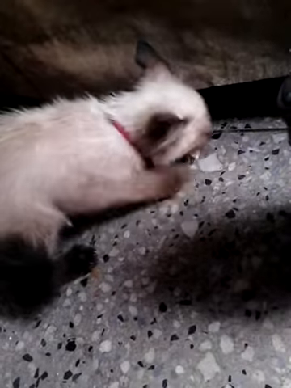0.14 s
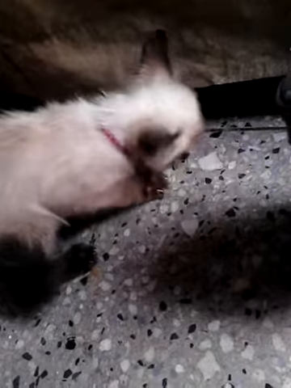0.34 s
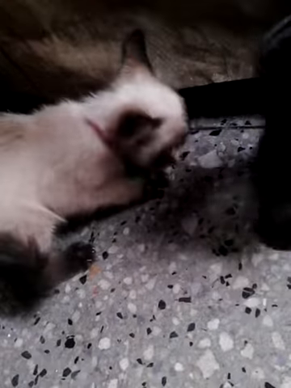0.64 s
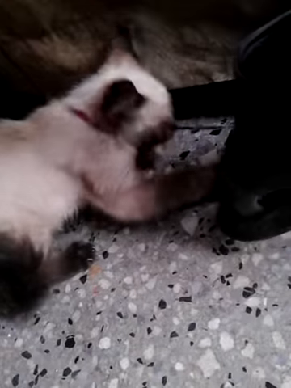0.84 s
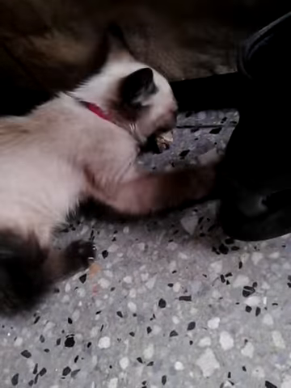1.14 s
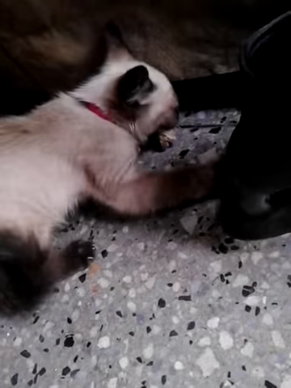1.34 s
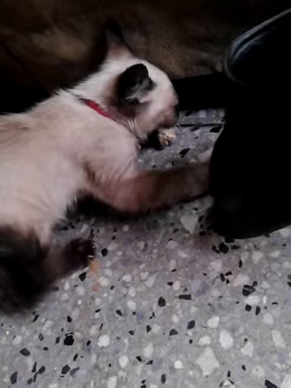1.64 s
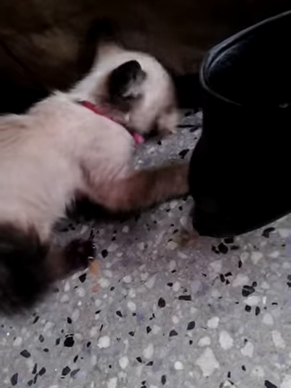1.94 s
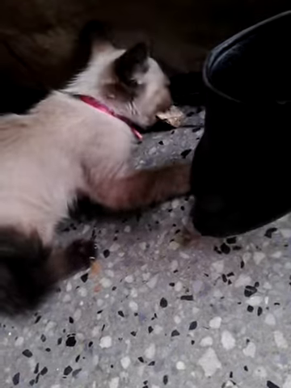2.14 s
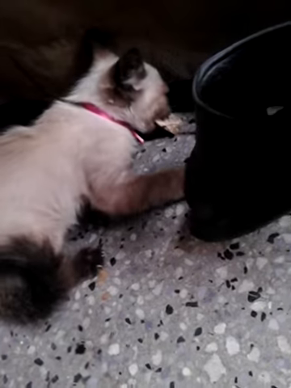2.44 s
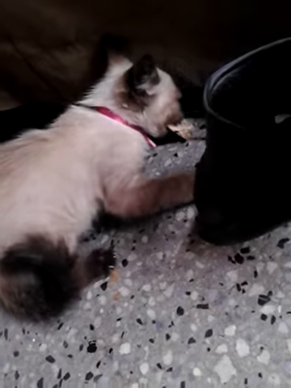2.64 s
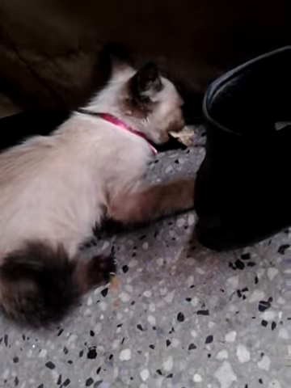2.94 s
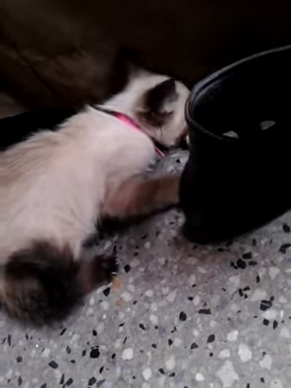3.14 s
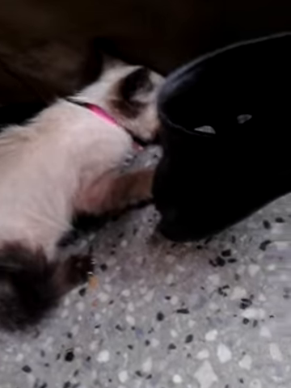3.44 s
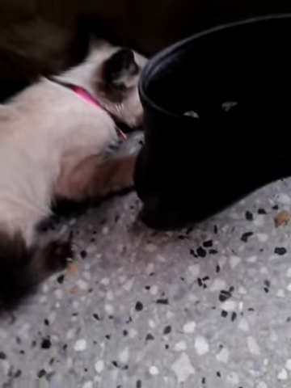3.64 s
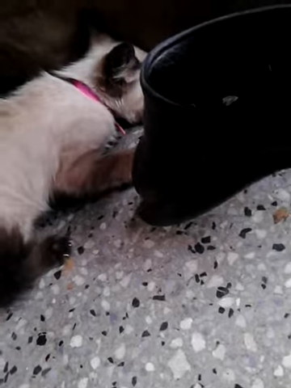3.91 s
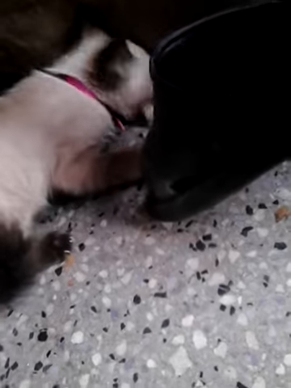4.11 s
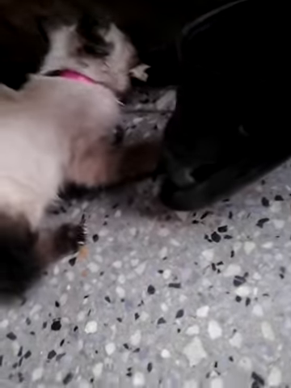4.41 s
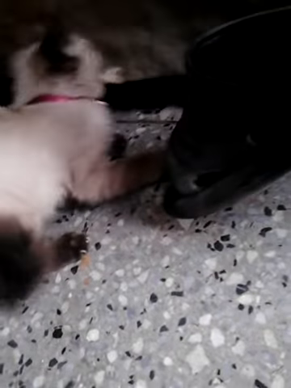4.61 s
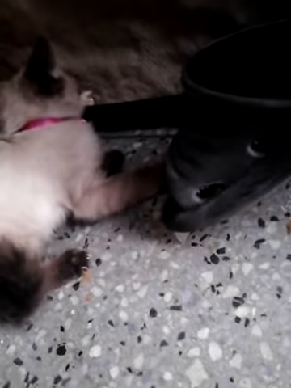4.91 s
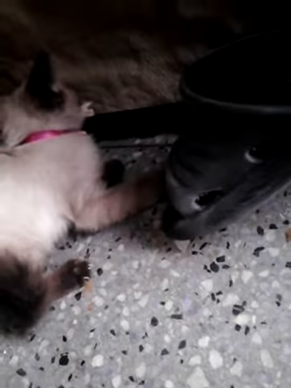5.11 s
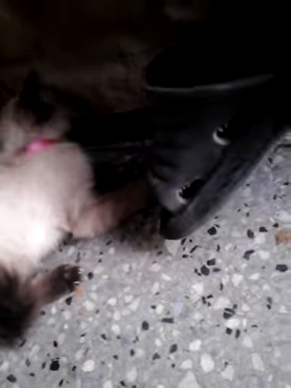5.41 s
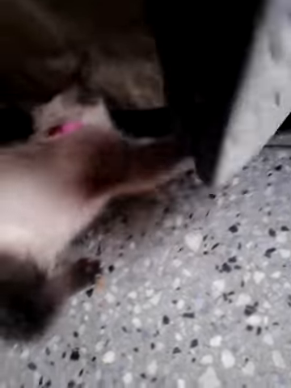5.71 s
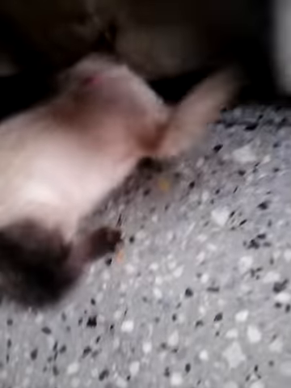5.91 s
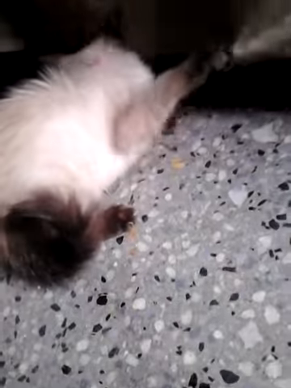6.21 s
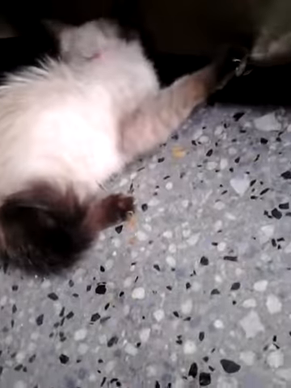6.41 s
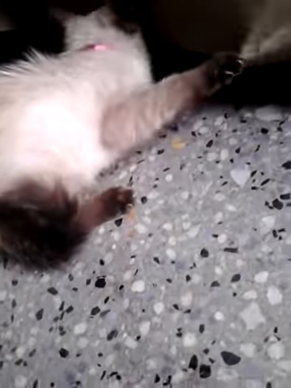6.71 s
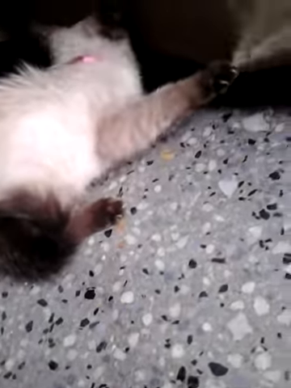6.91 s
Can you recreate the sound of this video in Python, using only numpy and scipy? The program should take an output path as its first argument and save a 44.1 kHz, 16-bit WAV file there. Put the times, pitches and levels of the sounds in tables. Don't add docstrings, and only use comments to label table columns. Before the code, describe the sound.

Close to a small microphone in a quiet hard-floored room, a kitten growls over its food. A short uneven growl is already under way, then two long wavering ones, the second loudest, then a weak short one and a last low one cut off at the end. Between them come faint rubbing, low hollow boot hums and thuds, and tiny claw ticks.

```python
import sys
import numpy as np
from scipy import signal
from scipy.io import wavfile
from scipy.ndimage import uniform_filter1d

SR = 44100
rng = np.random.default_rng(int(sys.argv[2]) if len(sys.argv) > 2 else 0)


def elevation(decibels):
    levels = np.asarray(decibels, float)
    return 10 ** (levels / 20)


def file_out(sig):
    cols = np.atleast_2d(sig).T
    lim = np.clip(cols, -1, 1)
    pcm = np.round(lim * 32767).astype(np.int16)
    wavfile.write(sys.argv[1], SR, pcm)


N = 311204
REGISTER_GLIDE_S = .04

# time_s, pitch_hz
PITCH = [
    [(0, 388), (.17, 404), (.25, 390), (.31, 404), (.36, 383), (.53, 385), (.68, 348)],
    [(.98, 355), (1.19, 428), (1.3, 416), (1.59, 402), (1.68, 394), (1.93, 395), (2.065, 455), (2.17, 432),
     (2.45, 296)],
    [(2.96, 287), (3.09, 318), (3.32, 360), (3.47, 400), (3.73, 394.5), (4.126, 399), (4.2, 387),
     (4.43, 396), (4.64, 316)],
    [(5.66, 337), (5.77, 348), (5.83, 370), (5.93, 392), (6.09, 380), (6.24, 325)],
    [(6.8, 317), (6.9, 331), (7.04, 329)],
]
# time_s, level_db
EFFORT = [
    [(0.0, -48), (0.01, -35.5), (0.042, -28.5), (0.054, -41.5), (0.165, -47.5), (0.36, -27), (0.402, -25.5),
     (0.53, -32), (0.68, -58)],
    [(0.98, -64), (1.028, -25.5), (1.24, -21), (1.664, -20), (1.804, -20), (2.116, -25), (2.234, -20),
     (2.52, -43.5), (2.575, -59)],
    [(2.96, -60), (3.2, -25), (3.61, -15.5), (3.65, -22), (3.8, -18.5), (4.12, -23), (4.26, -18.5),
     (4.63, -33.5), (4.84, -62)],
    [(5.69, -40), (5.776, -32), (5.826, -33.5), (5.928, -33.5), (5.934, -32), (5.98, -26), (6.1, -38.5),
     (6.26, -75)],
    [(6.8, -57.5), (6.87, -42), (6.98, -25.5), (7.09, -34.5)],
]
# time_s, mouth_hz, throat_hz, squeeze_0_to_1
TRACT = [
    [(0, 1690, 3440, 0.38), (.2, 1510, 3850, 0.58), (.32, 1540, 3400, 0.27), (.36, 1693, 2780, 0.51),
     (.5, 1696, 3300, 0.22)],
    [(.98, 1687, 3100, 0.39), (1.15, 1772, 3360, 0.59), (1.5, 1630, 3320, 0.36), (1.6, 1750, 3280, 0.46),
     (1.96, 1707, 3760, 0.46), (2.065, 1836, 3730, 0.82), (2.16, 1704, 3630, 0.46),
     (2.26, 1697, 2960, 0.24), (2.5, 1745, 3530, 0.4)],
    [(3.12, 1810, 2930, 0.36), (3.2, 1775, 3080, 0.36), (3.38, 1700, 3930, 0.45), (3.6, 1478, 4040, 0.34),
     (3.68, 1700, 4200, 0.26), (4.14, 1683, 4240, 0.37), (4.26, 1696, 4060, 0.39), (4.31, 1694, 2940, 0.65),
     (4.45, 1577, 2840, 0.48), (4.6, 1650, 2960, 0.21)],
    [(5.66, 1680, 3700, 0.08), (5.88, 1607, 3820, 0.34), (5.94, 1562, 4370, 0.46), (6.06, 1254, 4140, 0.17),
     (6.2, 835, 3860, 0.28)],
    [(6.8, 1300, 3770, 0.01), (7.04, 1340, 3870, 0)],
]
# start_s, glide_s, opening_0_to_1
JAW = [(0, .01, 1), (0.118, 0.048, 0), (0.321, 0.01, 0.93), (0.418, 0.017, 0.49), (.9, .01, 1),
       (1.421, 0.037, 0.83), (1.609, 0.056, 0.91), (2.0, 0.054, 0.79), (2.13, .05, 0.92),
       (2.255, 0.039, 0.79), (2.8, .01, 0.4), (3.08, .01, 0.77), (3.123, 0.0044, 0.87),
       (3.448, 0.093, 0.66), (3.62, 0.059, 0.5), (3.74, .02, 0.61), (3.88, .03, 0.54), (4.134, .015, 0.95),
       (4.21, 0.011, 0.8), (4.28, 0.02, 0.84), (4.4, 0.015, 0.86), (4.5, 0.13, 0.19), (5.498, .01, 0.41),
       (5.8, 0.019, 1), (5.88, 0.023, 1.0), (6.0, 0.083, 0.77), (6.6, .01, .1)]
# start_s, upper_over_lower_mouth_db, throat_rasp_db, sinus_ring_db, palate_ring_db
TONGUE = [(0, -13.5, 10, -3, 1), (.16, -16, -27, 14, 0), (.32, -3.5, 4.5, -1, 13),
          (.9, 1.5, 8.5, -17.5, -1), (1.15, -5, 4.5, 5, 16), (1.3, -3, 4, -1, -8), (1.4, 2, 7, -1, -5),
          (1.46, -7, 4, 3, -8), (1.53, -3, 5.5, 6, 5), (1.575, 2.5, 4.5, 7.5, 7), (1.85, 4, 5, 10, -8.5),
          (2.0, 0.5, 0.5, -7, -11.5), (2.16, -6.5, 4, 6.5, -17), (2.24, -12, 5.5, 5, -11.5),
          (2.36, 5.5, 0.5, 20, -9), (2.8, -21, -9, -4, -11), (3.11, 16, 1.5, 18.5, -4),
          (3.2, 3, 6, 12, -6.5), (3.3, 11, 6.5, 9, -8), (3.4, 13.5, 3, -4, 11), (3.53, 13.5, -5, -3, 13.5),
          (3.62, 4, 9, -10.5, 10), (3.74, -11, 6, -11, -17), (3.84, -7.5, 6.5, -0.5, 6.5),
          (4.04, 4.5, 7, 8, 12.5), (4.135, -11.5, 4, 2, -16.5), (4.2, 1, 4, -2, -7.5),
          (4.25, 7, 7, -8, 6.5), (4.38, 13.5, 5, -27, 7), (4.5, -3, 5.5, -20, -1),
          (4.62, -8, 7, -10, -12.5), (5.5, 7, 2.5, -16, -12), (5.85, -1.5, -21, 1.5, 13.5),
          (6.0, -2, -5, -4.5, -15), (6.6, 13, -11, 8, -19)]
# start_s, nose_db, cheek_db
PALATE = [(0, -1.5, 3.5), (.16, 4, 0), (.33, 2, -1.5), (.5, -11, -4), (.9, -1.5, -5.5), (1.09, -1.5, -0.5),
          (1.28, -2.5, -3), (1.58, 0, -6), (1.78, 0.5, 2), (1.93, -2, 2.5), (2.13, 0, 11),
          (2.33, -0.5, 6.5), (2.8, 4, -7), (3.14, -4, 7), (3.22, -1, 3), (3.36, -10.5, -3),
          (3.44, -11.5, -1), (3.62, -1.5, 0.5), (4.13, 6.5, -9), (4.19, -8.5, 1), (4.25, 2, 2),
          (4.44, 1, 6.5), (5.5, -15.5, -4), (5.79, 11.5, -11), (5.86, 0, -2), (6.08, 8, 2), (6.6, -4, 3.5)]


def growl(pitch, effort, tract):
    t = np.arange(effort[0][0], effort[-1][0] + .02, 1 / SR)
    n = len(t)
    mouth_hz, throat_hz, squeeze = curves(tract, t)
    opening = steps(JAW, np.transpose(JAW)[1], t)[1]
    tilt_db, rasp_db, sinus_db, palate_db = steps(TONGUE, .0073, t)
    nasal_db, cheek_db = steps(PALATE, REGISTER_GLIDE_S, t)

    aim_hz = curves(pitch, t)[0] + moments(QUAVERS, t)
    unsteady = np.clip(register(t, aim_hz)[0] / 30 - .2, 0, 1.5)
    waver = noise_band(n, 12, 40, order=3)
    throb = noise_band(n, 12, 40, order=3)
    hz = wandering(aim_hz, unsteady, waver)
    tissue = signal.butter(3, [250, 5500], "band", fs=SR, output="sos")
    pulses = signal.sosfilt(tissue, folds(t, hz))

    leak = rng.standard_normal(n)
    leaky = np.minimum(unsteady, 1) * leak
    parts = (
        chest_ring(pulses, hz, unsteady, waver),
        nose_ring(pulses, hz, leak, palate_db, unsteady, throb),
        mouth_ring(pulses + .028 * leaky, mouth_hz, squeeze, tilt_db),
        throat_ring(pulses, pulses + .09 * leaky, throat_hz, sinus_db, cheek_db - rasp_db, opening),
    )
    gains = levels(t, effort, opening, squeeze, rasp_db, nasal_db)
    voice = sum(gain * evened(part, 1500) for part, gain in zip(parts, gains))
    voice *= elevation(0.5 * unsteady * throb)

    since_start = t + (t[0] == 0) - t[0]
    until_end = t[-1] + (t[-1] > 7) - t
    fade = np.clip(np.minimum(since_start, until_end) / .02, 0, 1)
    return t[0], voice * fade


# middle_s, length_s, shift_hz
QUAVERS = [(1.105, .06, 10), (1.235, .05, -4), (1.37, .04, -8), (1.675, .06, -12), (1.72, .06, 10),
           (1.775, .05, -6), (1.825, .08, 10), (1.9, .08, -10), (2.086, .05, 14), (2.22, .08, -22),
           (2.33, .14, -14), (3.085, .06, 14), (3.145, .07, -20), (3.36, .07, 6), (3.415, .06, -14),
           (4.262, .07, 22), (4.35, .08, -10), (4.19, .05, -8), (4.5, .08, -8), (4.58, .1, 16)]


def wandering(aim_hz, unsteady, waver):
    wobble_hz = 13
    wobble = noise_band(len(aim_hz), wobble_hz, wobble_hz / 2, order=2)
    return aim_hz * (1 + .006 * unsteady * waver + .009 * np.minimum(.08 + unsteady, 1) * wobble)


def folds(t, hz):
    turns = np.cumsum(hz) / SR
    cycle = np.arange(1, int(turns[-1]))
    at = np.interp(cycle, turns, t)
    scatter_us, late_us = register(at, np.interp(at, t, hz))
    chance = rng.standard_normal((len(cycle), 3))
    drift = signal.lfilter([1], [1, -.8], chance[:, 2]) * 0.93
    pair = (-1.) ** cycle
    shift_us = scatter_us * (chance[:, 0] + drift) + late_us * pair
    place = (at - t[0] + 1e-6 * shift_us) * SR
    size = 1 + late_us / 260 * pair
    size *= np.exp(np.sqrt(scatter_us / 900) * np.clip(chance[:, 1], -2, 1.5))

    near = np.round(place).astype(int)[:, None] + np.arange(-8, 9)
    out = np.zeros(len(t) + 64)
    np.add.at(out, near, size[:, None] * np.sinc(near - place[:, None]) * np.hanning(17))
    return out[:len(t)]


# start_s, random_timing_us, second_pulse_late_us
REGISTERS = [(0, 28, 50), (.16, 8, 0), (.31, 12, 22), (.43, 10, 10), (.9, 75, 40), (1.17, 40, 68),
             (1.4, 17, 60), (1.6, 45, 30), (1.67, 25, 24), (2, 40, 15), (2.8, 50, 55), (3.43, 13, 45),
             (3.62, 6.5, 0), (4.125, 45, 30), (4.22, 85, 88), (4.38, 40, 85), (4.49, 40, 50),
             (4.64, 150, 40), (5.5, 70, 30), (5.92, 50, 65), (6.12, 60, 40), (6.6, -30, 25)]


def register(t, hz):
    taut_hz, slack_us_per_hz = 385, 1.25
    scatter_us, late_us = steps(REGISTERS, REGISTER_GLIDE_S, t)
    slack_us = slack_us_per_hz * np.maximum(taut_hz - hz, 0)
    return np.maximum(scatter_us + slack_us, 3), late_us


def chest_ring(pulses, hz, unsteady, waver):
    tone = evened(resonate(pulses, hz, 190, order=2), 1500)
    rumble = noise_band(len(pulses), hz, 160, order=2)
    return (tone + .15 * unsteady * rumble) * elevation(2.2 * unsteady * waver - 5.5)


def nose_ring(pulses, hz, leak, palate_db, unsteady, throb):
    nose = elevation(unsteady * (1.5 * throb - 3)) * resonate(pulses, 2 * hz, 240, order=2)
    nose -= elevation(-5.5) * resonate(pulses, 876, 270, order=2)
    nose += elevation(palate_db - 19.5) * resonate(pulses, 1083, 280, order=3)
    nose += elevation(-8.5) * resonate(pulses, 627, 150, order=2)
    return nose + elevation(-45.5) * resonate(leak, 750, 2200, order=4)


def mouth_ring(hoarse, mouth_hz, squeeze, tilt_db):
    split_hz, squeezed_split_hz = 57, 807
    half_hz = (split_hz + (squeezed_split_hz - split_hz) * squeeze) / 2
    low_hz, high_hz = mouth_hz - half_hz, mouth_hz + half_hz
    mouth = resonate(hoarse, low_hz, 330, order=3)
    mouth -= elevation(1.5 + tilt_db) * resonate(hoarse, high_hz, 410, order=3)
    return mouth - .7 * resonate(mouth, low_hz - 360, 260)


def throat_ring(pulses, breathy, throat_hz, sinus_db, cheek_db, opening):
    cheek_shut_db = -26
    throat = resonate(breathy, throat_hz, 540, order=3)
    throat += elevation(sinus_db - 11) * resonate(pulses, 4030, 380, order=3)
    cheek_gain = elevation(12.0 + cheek_db + cheek_shut_db * (1 - opening))
    throat += cheek_gain * resonate(breathy, 2549, 620, order=3)
    return throat - .9 * resonate(throat, 2890, 600)


# middle_s, length_s, depth_db
CATCHES = [(0.252, 0.014, -31), (.485, 0.015, -29), (1.068, 0.031, 2.5), (1.091, 0.037, -2),
           (1.137, 0.033, -7), (1.824, 0.071, 2), (3.125, 0.0091, 0.5), (3.136, 0.023, 3),
           (3.349, 0.026, 3.5), (3.523, 0.086, -0.5), (3.585, 0.25, 3.5), (3.08, 0.013, -4),
           (4.465, 0.087, 1.5), (2.447, 0.012, -12), (1.35, 0.015, -5), (1.649, 0.036, -12),
           (1.897, 0.092, -2.5), (2.108, 0.076, -2), (3.392, 0.021, -3), (4.188, 0.004, -3),
           (4.349, 0.22, -7), (5.915, 0.02, -12)]
# start_s, chest_over_effort_db
CHEST = [(0, -20.5), (.15, -9.5), (.31, -22), (.43, -18), (.9, -16.5), (1.16, -15), (1.55, -12), (1.9, -26),
         (1.97, -15), (2.2, -22.5), (2.28, -18), (2.32, 1), (2.8, 3), (3.06, 6), (3.14, -19), (3.23, -14.5),
         (3.36, -30), (3.5, -29), (3.62, -21.5), (4.23, -22.5), (4.29, -12.5), (4.43, -16.5), (4.5, -30),
         (4.57, -1), (4.69, 7.5), (5.5, -21.5), (5.9, -24), (6.1, -13), (6.6, -2.5), (6.9, -3.5),
         (6.94, -11)]


def levels(t, effort, opening, squeeze, rasp_db, nasal_db):
    shut_db, gape_db = -45.5, 14
    loose_db, tight_db = -54.5, 14
    effort_db = curves(effort, t)[0] + moments(CATCHES, t)
    mouth = elevation(shut_db + (gape_db - shut_db) * opening)
    total = np.hypot(1, mouth)
    chest = elevation(steps(CHEST, REGISTER_GLIDE_S, t)[0])
    nose = elevation(nasal_db - 4.5) / total
    throat = elevation(loose_db + (tight_db - loose_db) * squeeze + rasp_db)
    return elevation(effort_db) * np.array([chest, nose, mouth / total, throat])


# start_s, length_s, hum_db, pitch_hz, thud_over_hum_db
DRAGS = [(0.233, 0.096, -61.5, 150, -23), (0.908, .12, -49.5, 148, -30), (2.045, 0.1, -56, 145, -10),
         (2.378, 0.11, -69, 145, 6), (2.686, 0.16, -80, 144, -3.5), (3.586, .45, -33.5, 146, -43),
         (4.171, 0.52, -46.5, 128, -28), (4.469, 0.4, -34.5, 132, -2.5), (4.769, 0.18, -30, 139, -41),
         (4.914, 0.1, -48, 140, -6), (5.178, 0.18, -53, 143, -36), (5.752, 0.15, -55, 148, -32.5),
         (6.186, 0.2, -47, 155, -22.5), (6.658, 0.099, -45.5, 123, -22), (6.779, 0.074, -44, 120, -1),
         (6.947, 0.14, -52, 120, 0.5)]


def boot():
    rest_hum_db, rest_thud_db = -59.5, -57.5
    t = np.arange(N) / SR
    start, length, hum_db, pitch_hz, thud_db = np.transpose(DRAGS)
    hz = np.interp(t, start + length / 2, pitch_hz)
    progress = np.clip((t[:, None] - start) / length, 0, 1)
    swell = np.sin(np.pi * progress ** 1.08) ** 2
    tone = np.sqrt(2) * np.sin(2 * np.pi * np.cumsum(hz) / SR)
    hum = evened(0.85 * tone + 0.4 * noise_band(N, hz, 80, order=2))
    thud = noise_band(N, 130, 200, order=2)
    hum_gain = elevation(rest_hum_db) + swell @ elevation(hum_db)
    thud_gain = elevation(rest_thud_db) + swell @ elevation(hum_db + thud_db)
    return hum_gain * hum + thud_gain * thud


# time_s, level_db
RUB = [
    (0.55, -68.5),
    (0.76, -65.5),
    (0.92, -57.5),
    (1.21, -52.5),
    (1.42, -63.5),
    (1.7, -55),
    (2.0, -67.5),
    (2.1, -57.5),
    (2.27, -79),
]
# freq_hz, density_db_per_hz
RUB_COLOUR = [(710, -55.5), (1200, -34.5), (1700, -12), (2190, -37), (2480, -6.5), (3180, -5.5), (3540, -7),
              (4810, 0.5), (5070, -8), (6520, -9), (7420, -41), (9650, -50.5), (16300, -120)]
# freq_hz, width_hz, level_db
RUB_RINGS = [(3180, 190, -1), (4150, 19, -3), (4960, 42, -18.5), (5365, 26, 0.5), (6230, 70, -13.5),
             (8740, 2000, -13)]


def rub():
    t = np.arange(N) / SR
    noise = coloured(RUB_COLOUR, patchy_db=4.5)
    white = rng.standard_normal(N)
    rings = sum(elevation(db) * evened(resonate(white, hz, 2 * width, order=3)) for hz, width, db in RUB_RINGS)
    on = np.clip(np.minimum(t - RUB[0][0], RUB[-1][0] - t) / 0.044, 0, 1)
    return elevation(curves(RUB, t)[0] + 6.5) * on * (noise + elevation(-16) * rings)


# start_s, end_s, pitch_hz, width_hz,
# level_db
WHISTLES = [(0.33, 0.47, 6350, 350, -66.9), (0.33, 0.46, 4650, 350, -53.8), (0.595, 0.65, 3700, 700, -48.8),
            (3.22, 3.38, 5300, 200, -61), (3.38, 3.5, 5000, 300, -58), (3.47, 3.59, 5000, 25, -62),
            (3.19, 3.27, 3120, 90, -54), (3.47, 3.61, 3400, 25, -56), (2.26, 2.34, 890, 25, -34),
            (2.36, 2.575, 880, 25, -46), (4.56, 4.8, 1700, 300, -58), (4.11, 4.17, 3580, 20, -57),
            (4.1, 4.2, 4350, 250, -49), (4.27, 4.36, 3200, 600, -38), (4.34, 4.56, 3150, 300, -51),
            (3.72, 4.04, 5700, 150, -57.9), (3.8, 4.02, 5950, 150, -60.5), (3.78, 3.93, 4850, 150, -56.4),
            (3.76, 3.92, 1820, 90, -41), (3.82, 3.88, 4020, 150, -48), (3.78, 3.9, 2350, 150, -52),
            (3.74, 3.8, 3150, 250, -58.3), (3.65, 3.73, 7570, 30, -88.4), (3.88, 4.15, 7570, 10, -76.1),
            (4.38, 4.9, 5350, 80, -76.0), (5.01, 5.27, 6720, 15, -76.8), (5.56, 6.15, 5480, 170, -68.0),
            (5.68, 6.0, 5850, 140, -72.7), (5.6, 5.77, 3700, 80, -72.3), (5.925, 6.05, 4400, 600, -58),
            (5.9, 6.05, 6350, 150, -76.8), (5.8, 6.12, 2300, 150, -57.5), (4.04, 4.09, 8500, 1500, -70.8),
            (0, .9, 4730, 30, -70), (4.04, 4.09, 3300, 600, -57), (6.74, 6.81, 6000, 1500, -76.5)]


def whistles():
    out = np.zeros(N)
    for start, end, hz, width, db in WHISTLES:
        n = round((end - start) * SR)
        drift = 1 + .003 * noise_band(n, 4, 12, order=3)
        whistle = noise_band(n, hz * drift, 1.7 * width, order=3)
        add(out, start, elevation(db) * whistle * signal.windows.tukey(n, .5))
    return out


# start_s, peak_db, ring_hz
TICKS = [(0.607, -38.5, 3900), (4.885, -52.5, 1494), (5.2244, -59, 1600), (5.912, -49.5, 4020),
         (5.913, -52, 5660), (5.933, -46, 4650), (5.934, -49, 5420), (5.934, -51, 3180),
         (5.95, -44.5, 5350), (4.06, -68, 10800), (4.07, -69, 9000), (5.237, -73.5, 10200),
         (6.5904, -61, 1660)]


def ticks():
    out = np.zeros(N)
    t = np.arange(400) / SR
    for start, db, hz in TICKS:
        add(out, start, elevation(db - 60 * t / 0.055) * np.sin(2 * np.pi * hz * t) * np.minimum(t / 0.0012, 1))
    return out


def room(x, t60_s):
    taps = np.zeros(SR // 2)
    at = np.arange(200, len(taps) - 20, 20)
    taps[at + rng.integers(0, 20, len(at))] = rng.choice([-1., 1.], len(at))
    decay = elevation(-60 * np.arange(len(taps)) / SR / t60_s)
    tail = signal.lfilter([1], [1, -.6], taps * decay)
    return signal.fftconvolve(x, tail / np.linalg.norm(tail))[:N]


# freq_hz, density_db_per_hz
AIR = [(24, -41.5), (40, -28.5), (58, -24.5), (102, -31.5), (145, 1), (189, -0.5), (211, -5.5), (262, -2.5),
       (356, -9), (380, -6.5), (800, -14.5), (1150, -21.5), (1540, -26), (2450, -28), (3250, -27),
       (5400, -35.5), (7420, -43.5), (9650, -83), (16300, -120)]
# start_s, middle_hump_db
HUMP_STEPS = [
    (0, 20),
    (.16, 9.6),
    (.5, 10.4),
    (2.9, 13),
    (4.66, 5),
    (4.86, 10.7),
    (5.6, 15.3),
    (6.08, 3.5),
    (6.4, 7.9),
    (6.84, 3),
]


def air():
    level_db, hump_glide_s, hump_hz = -45.5, 0.046, [1350, 2020]
    noise = coloured(AIR, patchy_db=1.3)
    rest = signal.sosfiltfilt(signal.butter(2, hump_hz, "stop", fs=SR, output="sos"), noise)
    hump_db = steps(HUMP_STEPS, hump_glide_s, np.arange(N) / SR)[0]
    return elevation(level_db - 7.0) * (rest + elevation(hump_db) * (noise - rest))


def coloured(points, patchy_db):
    hz = np.fft.rfftfreq(1024, 1 / SR)
    a, b, patches = rng.standard_normal((N // 256 + 5, 513, 3)).T
    patches = evened(uniform_filter1d(uniform_filter1d(patches, 8, 0), 12, 1))
    f, db = np.transpose(points)
    shape_db = np.interp(np.log(hz + 1), np.log(f + 1), db)[:, None]
    spectrum = (a + 1j * b) * elevation(shape_db + patchy_db * patches)
    return evened(signal.istft(spectrum, nperseg=1024, noverlap=768)[1][:N])


def resonate(x, hz, width, order=1):
    turn = np.exp(2j * np.pi * np.cumsum(hz * np.ones(len(x))) / SR)
    r = np.exp(-np.pi * width / SR)
    low = x / turn
    for _ in range(order):
        low = signal.lfilter([1 - r], [1, -r], low)
    return 2 * (turn * low).real


def noise_band(n, hz, width, order):
    return evened(resonate(rng.standard_normal(n), hz, width, order))


def evened(x, span=None):
    power = uniform_filter1d(uniform_filter1d(x ** 2, span), span) if span else np.mean(x ** 2)
    return x / np.sqrt(np.abs(power) + 1e-20)


def curves(rows, t):
    s, *columns = np.transpose(rows)
    return [np.interp(t, s, c) for c in columns]


def steps(rows, glide_s, t):
    s, *columns = np.transpose(rows)
    knots = np.ravel([s[1:], (s + glide_s)[1:]], "F")
    return [np.interp(t, knots, np.repeat(c, 2)[1:-1]) for c in columns]


def moments(rows, t):
    middle, length, height = np.transpose(rows)
    return np.cos(np.pi * np.clip((t[:, None] - middle) / length, -.5, .5)) ** 2 @ height


def add(mix, start_s, sound):
    part = mix[round(start_s * SR):][:len(sound)]
    part += sound[:len(part)]


def scene():
    near = whistles() + ticks() + rub()
    for pitch, effort, tract in zip(PITCH, EFFORT, TRACT):
        add(near, *growl(pitch, effort, tract))
    return (near + elevation(-10) * room(near, 0.14) + boot() + air())[None]


def low_pass(x):
    return signal.sosfilt(signal.butter(12, 15480, fs=SR, output="sos"), x)


def record(dry):
    thin = signal.sosfilt(signal.butter(2, 55, "high", fs=SR, output="sos"), dry)
    soft = np.tanh(thin)
    dull = signal.sosfilt(signal.butter(4, 9500, fs=SR, output="sos"), soft)
    hissy = dull + elevation(-88) * rng.standard_normal(dry.shape)
    return low_pass(hissy)


dry = scene()
out = record(dry)
file_out(out)
```